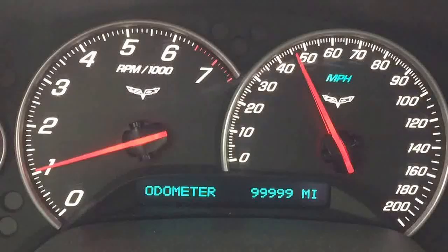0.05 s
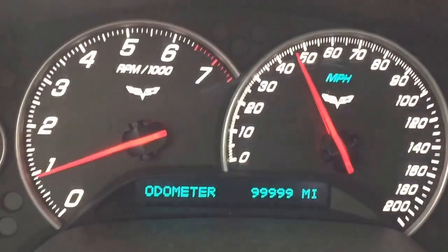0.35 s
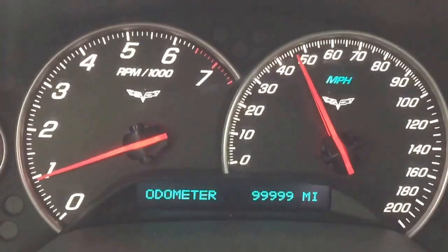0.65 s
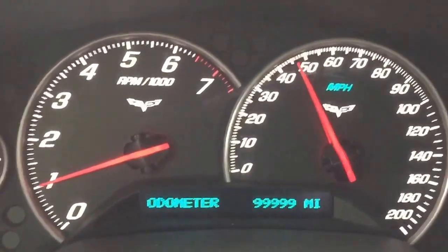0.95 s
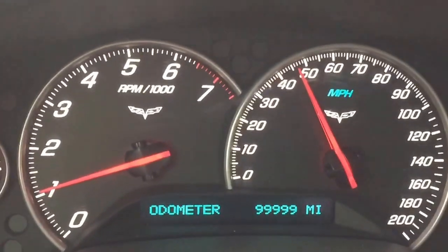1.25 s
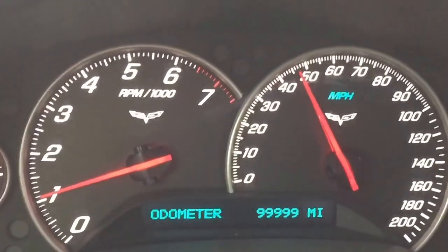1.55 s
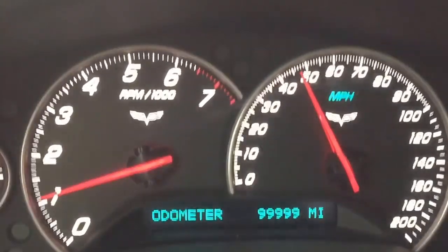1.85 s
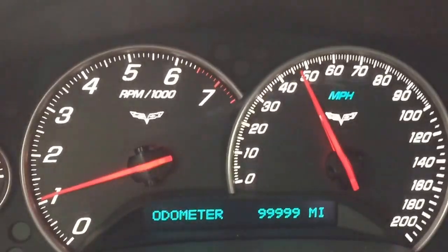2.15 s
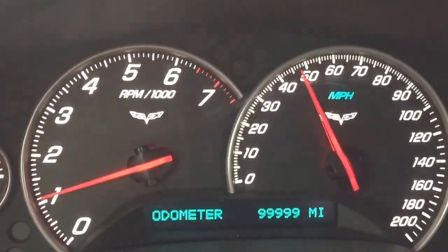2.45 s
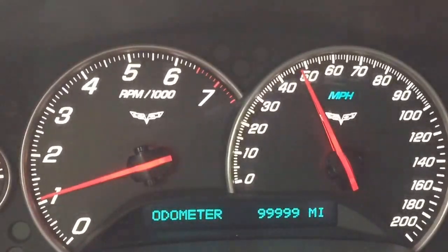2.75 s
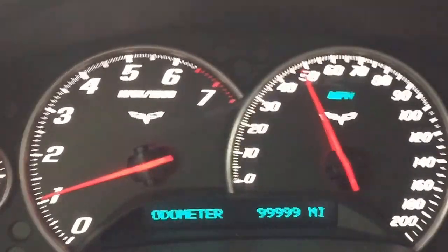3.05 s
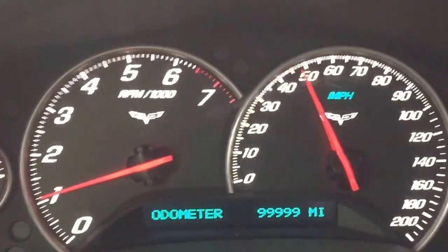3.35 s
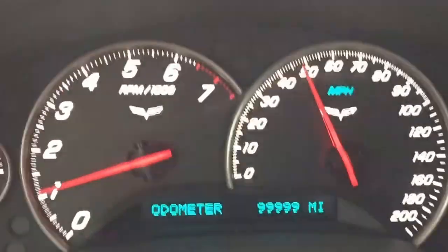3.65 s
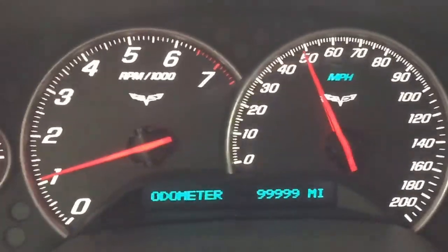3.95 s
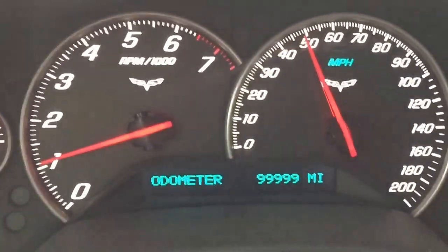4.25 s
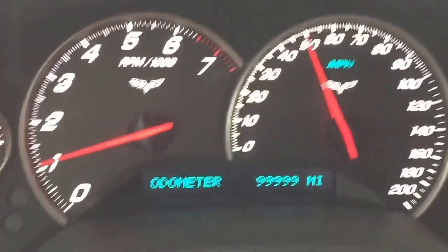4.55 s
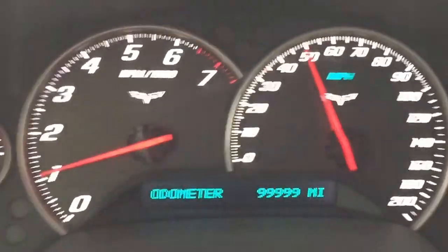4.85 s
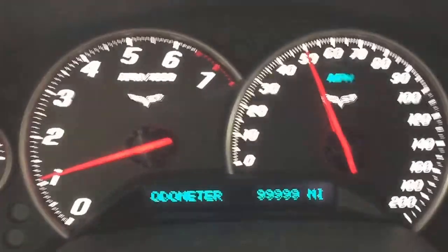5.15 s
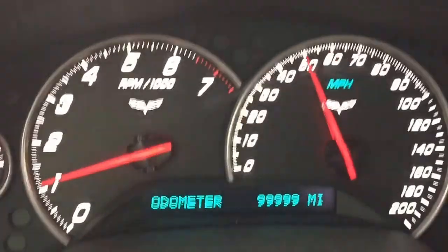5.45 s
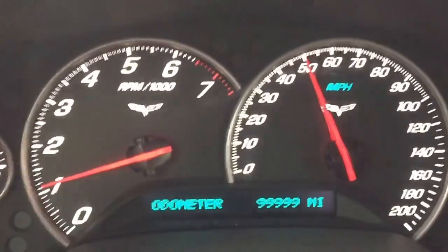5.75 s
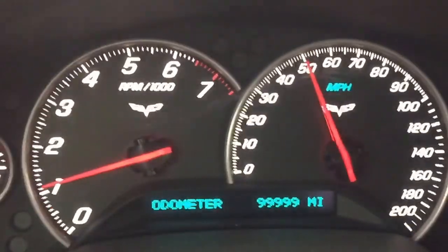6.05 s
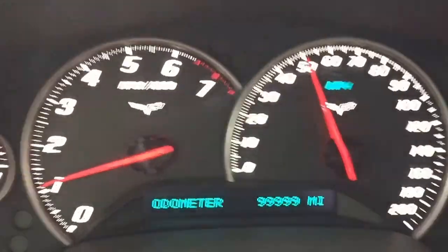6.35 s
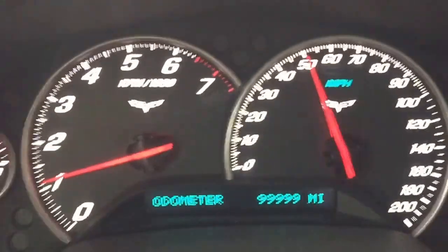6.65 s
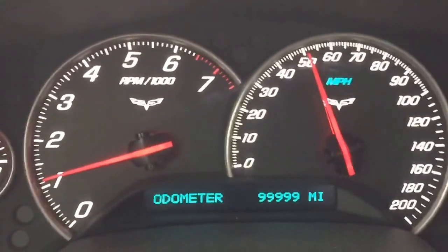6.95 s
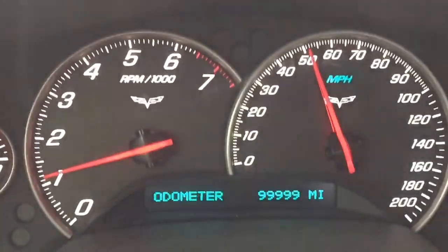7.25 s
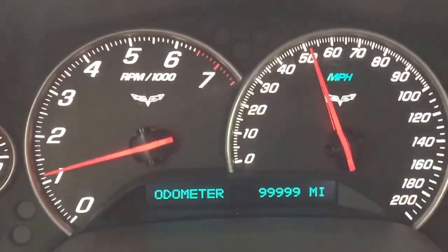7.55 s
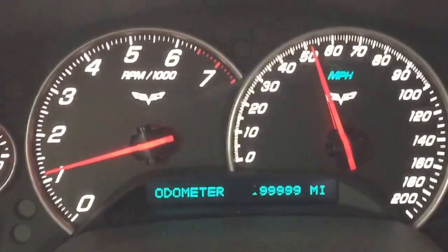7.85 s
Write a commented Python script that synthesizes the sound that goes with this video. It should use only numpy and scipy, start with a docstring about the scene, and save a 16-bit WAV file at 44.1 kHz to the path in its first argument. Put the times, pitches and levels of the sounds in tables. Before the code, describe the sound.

A deep, steady rumble fills the inside of a car on a highway for about eight seconds, heard from a handheld microphone. The body booms, the tyres roar and hum, and bumps add soft low thumps. A low droning tone at the start fades within the first second or so, as the engine's hum comes up. Throughout, a worn wheel bearing growls under the floor, pulsing about ten times a second, and everything creeps slightly up in pitch as the car gathers speed. Faint plastic ticks from a hand on the microphone come at around 1.1, 1.8 and 3.5 seconds. At about 4.8 to 5 seconds, two sharp, hollow clicks and a softer third stand out close up, followed by a very faint rub, thin squeak and trim chatter. Another knock comes at about 6.1 seconds, and the rumble carries on to the end.

```python
"""Road rumble inside a car gently gathering speed on a highway, taken in mono on a handheld recorder.
All around, the body booms and the tyres roar and hum; the slow-turning engine and the driveshaft drone.
From under the floor, a worn wheel bearing growls once in every turn of the wheel.
Right at the microphone a hand shifts on the case: plastic clicks, light rubs, two thin squeaks and
hollow knocks. Out in the cabin, loose trim chatters faintly."""
import sys
import numpy as np
from scipy import signal
from scipy.fft import rfft, irfft, next_fast_len
from scipy.io import wavfile
from scipy.ndimage import uniform_filter1d

SR = 44100
rng = np.random.default_rng(int(sys.argv[2]) if len(sys.argv) > 2 else 0)


def inscribe(sig):
    """Save sig as 16-bit PCM at rate SR to the path in sys.argv[1].

    A 1-D sig is mono; a 2-D sig holds one channel per row.
    Samples are clipped to [-1, 1] before scaling.
    """
    pcm = np.round(np.clip(np.atleast_2d(sig).T, -1, 1) * 32767)
    wavfile.write(sys.argv[1], SR, pcm.astype(np.int16))


N = 348390
TIME, HZ = np.arange(N) / SR, np.fft.rfftfreq(N, 1 / SR)
FIRINGS_PER_TURN, SHAFT_PER_TURN, BALLS_PER_TURN = 7.275, 5.195, 9.575  # cycles per turn of the wheel
BAND_EDGE_HZ = 16000

# Spectral shape of the road noise in the cabin: (frequency [Hz], relative density [dB])
ROAD_SPECTRUM = [(10, -58.5), (25, -33.5), (39, 3), (57, 5.5), (95, -3), (125, -13.5), (210, -16),
                 (300, -24.5), (470, -33), (900, -33), (1400, -36), (2500, -50), (4500, -70), (8000, -83),
                 (16000, -86)]
# Cabin and tyre-cavity resonances that the road excites: (centre [Hz], width [Hz], lift [dB])
CABIN_RESONANCES = [(145.4, 5.7, 5.5), (207, 2.2, 1), (251, 21, -1), (340, 10, -2), (408, 22, 4),
                    (462, 10, -4.5), (625.5, 5.4, 5.5), (757, 42, -2.5), (917, 27, 1.5), (1143, 3, 7.5),
                    (1467, 3.4, 9.5), (2152, 44, 5.5), (2703, 40, 5), (4900, 420, -5.5)]
# Rumble from the coarseness of the road surface: (time [s], level [dB])
SURFACE_RUMBLE = [(.1, -17.5), (.7, -36.5), (1.0, -26), (1.4, -28.5), (1.9, -22.5), (3.1, -24.5),
                  (4.5, -29.5), (5.6, -25), (7.0, -20.5), (7.9, -26.5)]
# Bumps in the road: (time [s], half length [s], suspension thump [dB], body boom [dB])
ROAD_BUMPS = [(0.298, 0.054, -19, -31), (0.514, 0.024, -20.5, -34), (0.702, 0.1, -19, -29.5),
              (1.11, 0.045, -25, -29), (1.79, 0.041, -17.5, -24), (2.202, 0.11, -31, -25.5),
              (2.509, 0.033, -17, -38), (2.753, 0.23, -29, -31), (3.485, 0.13, -39.5, -25),
              (3.683, 0.053, -16.5, -40), (4.301, 0.024, -20.5, -42), (4.831, 0.12, -19, -27.5),
              (5.004, 0.048, -17.5, -27), (5.14, 0.019, -15, -29), (5.65, 0.027, -17.5, -25.5),
              (5.92, 0.077, -16.5, -42), (6.174, 0.085, -35, -21.5), (6.87, 0.02, -20, -37),
              (7.368, 0.019, -15, -27.5), (7.633, 0.031, -14, -25.5)]
# Hums of the uneven tread: (order [cycles per tyre turn], level at resonance [dB])
TREAD_ORDERS = [(19, -36), (20, -38.5), (22, -33.5), (24, -37.5)]
# Engine tones under changing load: (time [s], firing tone [dB], its octave [dB])
ENGINE_LOAD = [(.1, -46, -36), (.7, -42.5, -36), (1.0, -25, -27), (1.5, -25, -32.5), (1.9, -26, -38.5),
               (2.5, -28, -30), (3.3, -23, -28.5), (4.25, -24.5, -34.5), (4.95, -34.5, -34),
               (6.1, -25, -32.5), (6.8, -26.5, -31), (7.8, -41, -41)]
# Half-order tone from uneven firing: (time [s], level [dB])
ENGINE_LOPE = [(.1, -36), (1.2, -35.5), (2.0, -51.5)]
# Hub and suspension modes that the bearing rings: (frequency [Hz], width [Hz], relative level [dB])
HUB_MODES = [(196.6, 38, -10.5), (286.2, 19, -6.5), (368.8, 46, 4), (408, 26, -4), (521.5, 34, -10.5),
             (556, 24, -2), (615.6, 15, -5.5), (675, 22, -12.5), (723, 24, -8.5), (753.3, 17, -12.5),
             (846, 38, -17.5), (934, 53, -11.5), (1128, 34, -17.5), (1454, 12, -19)]
# Growl of the worn bearing: (time [s], level [dB])
BEARING_GROWL = [(.09, -38), (.2, -42.5), (.3, -42), (.39, -37.5), (.49, -42), (.59, -39), (1.3, -38),
                 (1.4, -35), (1.5, -37), (1.61, -35.5), (1.95, -37.5), (2.1, -36.5), (3.45, -34.5),
                 (3.6, -36), (4.03, -34.5), (4.15, -34), (4.85, -35.5), (5.7, -35), (6.5, -37.5),
                 (7.8, -35.5)]
# Plastic clicks at the microphone: (time [s], level [dB], rise [s], low-end weight [dB], t60 [s],
# relative case ring [dB], relative ping [dB], ping pitch [Hz])
CASE_CLICKS = [(.268, -68, .0002, -24, .05, -12, -6, 6200), (.903, -64, .0002, -20, .05, -6, -17, 9500),
               (.982, -64, .0002, -20, .03, -6, -11, 9500), (1.111, -49.5, .0006, -16, .038, -2, -8, 5500),
               (1.3012, -57.5, .001, 3, 0.12, -7, -5, 6100), (1.795, -49, 0.0027, 0, .1, -5, -11, 6100),
               (3.485, -56.5, .002, -10, .19, -7, -13, 6200), (3.516, -52.5, .003, 9, 0.14, -4, -14, 4270),
               (3.6443, -61.5, .002, 17, 0.27, -4, -6, 4800), (4.803, -61, .0005, -13, 0.038, -7, -3, 5550),
               (4.821, -54, .0005, -3, .088, -6, -12, 5550), (4.8312, -24.5, .0006, -6, .068, 0, -20, 5600),
               (4.8398, -34.5, .0004, 8.5, 0.036, 2.5, -19, 5550),
               (4.883, -35.5, .0004, 6.5, 0.062, -5, -16, 5400), (4.950, -59, .0005, -5, .08, -6, -5, 6200),
               (5.0044, -44.5, 0.00051, 8, .045, -6, -9, 5550), (6.027, -62, 0.0017, 16, .19, -8, -6, 5550),
               (6.135, -35, .0005, 4, .051, -7, -24, 5550),
               (6.1378, -40.5, .0005, 7.5, 0.084, 0, -24, 6160)]
# Spectral shape of a click: (frequency [Hz], relative density [dB])
CLICK_SPECTRUM = [(200, -11.5), (500, 2.5), (900, 11.5), (2000, 9), (3500, 0.5), (5000, -3), (7500, -7),
                  (10000, -8.5), (13000, -10.5), (16000, -16)]
# Modes of the recorder's plastic case: (frequency [Hz], relative level [dB], t60 [s])
CASE_MODES = [(760, -11, .06), (1020, -9, .06), (1432, -7, .05), (1680, -4, .058), (1890, -8, .06),
              (2288, -8, .07), (2428, -7.5, .05), (3058, -9, .046), (3564, -17, .05), (4377, -20, .05),
              (5480, -25, .065), (8764, -22, .055), (9545, -21.5, .06), (13370, -28, .05)]
# Clear modes of a small plastic part: (multiple of the ping pitch [ratio], relative level [dB], t60 [s])
PING_MODES = [(.85, -14, 0.04), (1, 6, 0.05), (1.17, -4.5, 0.045), (1.8, -18.5, .04), (2.56, -6, 0.045)]
# Rubs of the hand, and the brief narrow ringing of small plastic ticks:
# (time [s], half length [s], level [dB], centre [Hz], width [Hz])
RUBS_AND_TICKS = [(.285, 0.0087, -74, 6270, 392), (.735, 0.021, -74, 4600, 1200),
                  (3.524, .01, -63.5, 4290, 300), (3.645, 0.0091, -63, 4830, 500),
                  (3.677, .016, -73, 5460, 90), (3.745, .025, -73.5, 11500, 1900),
                  (4.94, 0.079, -66, 4500, 4000), (5.047, 0.074, -66, 4500, 4000),
                  (5.082, .008, -69, 5800, 1200), (5.2, 0.11, -74, 11900, 2400),
                  (1.22, .09, -81, 11000, 2600), (5.197, .07, -70, 4450, 80), (5.22, 0.15, -71, 3600, 1700),
                  (5.58, 0.032, -75, 11800, 1690), (5.68, 0.2, -72, 4600, 2860),
                  (6.19, 0.027, -65, 4540, 3600), (6.313, 0.034, -72, 5000, 3040),
                  (7.36, 0.066, -76, 5000, 2980), (7.81, .06, -76, 4500, 900)]
# Squeaks of a sliding fingertip: (time [s], half length [s], level [dB], top pitch [Hz])
FINGER_SQUEAKS = [(1.23, 0.13, -78, 10650), (5.176, .08, -66.5, 12000)]
# Partials of a squeak: (multiple of its pitch [ratio], relative level [dB])
SQUEAK_PARTIALS = [(.78, -11), (.86, -10), (.915, -4), (1, 1.5), (1.09, -10.5), (1.175, -4.5), (1.245, -4)]
# Spells of chatter from shaken trim: (time [s], half length [s], level [dB])
TRIM_RATTLES = [(1.88, 0.13, -77), (3.757, 0.17, -73.5), (4.94, .04, -65), (5.05, 0.053, -66),
                (5.69, 0.16, -74), (6.18, .014, -64)]
# Modes of the loose trim: (frequency [Hz], relative level [dB], t60 [s])
TRIM_MODES = [(3730, 2, .014), (4450, 2, .02), (4800, -1, .012), (5550, -2, .02), (6200, -1, .02),
              (6900, -5, .012), (8270, -9, .014), (9000, -10, .025), (9545, -10, .018), (12230, -12, .008)]
# Hard clicks that jar the whole case: (time [s], clunk [dB], clunk pitch [Hz], clunk t60 [s], thud [dB])
CASE_KNOCKS = [(4.832, -13.8, 883, .06, -21), (4.884, -16.5, 890, .05, -18), (5.005, -28, 900, .06, -24),
               (6.138, -26.5, 921, .06, -24)]


def amp(db):
    """Decibels to gain."""
    return 10 ** (np.asarray(db) / 20)


def unit(x):
    """Scales to rms 1."""
    return x / np.sqrt(np.mean(x ** 2) + 1e-20)


def curve(rows, column=1):
    """One column of a timed table, interpolated at every sample."""
    rows = np.asarray(rows)
    return np.interp(TIME, rows[:, 0], rows[:, column])


def swell(time_s, half_s):
    """A bell-shaped envelope, down to 1/e at half_s either side of its peak."""
    return np.exp(-((TIME - time_s) / half_s) ** 2)


def colour(points, resonances, hz):
    """Gain of a broad spectrum with resonant humps on it."""
    points_hz, db = np.transpose(points)
    humps = sum(lift * np.exp(-.5 * ((hz - centre) / width) ** 2) for centre, width, lift in resonances)
    return amp(np.interp(np.log(hz + 1), np.log(points_hz), db) + humps)


def noise(gain, size=N):
    """Noise of rms 1 with the given spectrum."""
    padded = next_fast_len(size, True)
    white = rfft(rng.standard_normal(padded))
    shape = np.interp(np.linspace(0, 1, len(white)), np.linspace(0, 1, len(gain)), gain)
    return unit(irfft(white * shape, padded)[:size])


def drift(rate_hz):
    """A slow random wander of rms 1."""
    return noise(np.exp(-.5 * (HZ / rate_hz) ** 2))


def below(edge_hz):
    """Low side of a steep crossover, as a share of power."""
    return 1 / (1 + (HZ / edge_hz) ** 12)


def steadied(x, span_s):
    """Takes the slow swells out of a noise."""
    size = int(span_s * SR)
    return x / np.sqrt(uniform_filter1d(uniform_filter1d(x ** 2, size), size) + 1e-12)


def resonance(hz, centre_hz, width_hz):
    """Gain of a resonance for a tone that glides through it."""
    return 1 / np.hypot(1, 2 * (hz - centre_hz) / width_hz)


def hum(cycles, rate_hz=3, wander=.063):
    """A tone of rms 1 with a slightly unsteady phase."""
    return np.sqrt(2) * np.cos(2 * np.pi * (cycles + wander * drift(rate_hz)))


def ring(t, hz, db, t60):
    """One struck mode dying away."""
    return amp(db - 60 * t / t60) * np.sin(2 * np.pi * hz * t)


def add(mix, time_s, sound):
    """Mixes a sound in at the given time."""
    part = mix[round(time_s * SR):][:len(sound)]
    part += sound[:len(part)]


def road(boom_db=-26.5, roar_db=-37.5, roar_rise_db_per_s=.1023):
    """All around the microphone: the road shakes the suspension, booms in the body, roars off the tyres."""
    cabin = colour(ROAD_SPECTRUM, CABIN_RESONANCES, HZ)
    lows, low_mids = below(90.6), below(297.5)
    bump_thumps = sum(amp(db) * swell(time_s, half_s) for time_s, half_s, db, _ in ROAD_BUMPS)
    bump_booms = sum(amp(db) * swell(time_s, half_s) for time_s, half_s, _, db in ROAD_BUMPS)
    rumble = steadied(noise(cabin * np.sqrt(lows)), span_s=.014)
    rumble *= np.hypot(amp(curve(SURFACE_RUMBLE) - .5 * drift(9.5)), bump_thumps)
    boom = steadied(noise(cabin * np.sqrt((1 - lows) * low_mids)), span_s=.15)
    boom *= np.hypot(amp(boom_db + drift(12)), bump_booms)
    roar = noise(cabin * np.sqrt(1 - low_mids))
    roar *= amp(roar_db + roar_rise_db_per_s * TIME + .5 * drift(33))
    return rumble + boom + roar


def body_drone(peak_db=-23.5, drone_hz=59.4):
    """Early on, the body drones on a near-pure low tone that soon fades."""
    return amp(peak_db) * swell(time_s=.16, half_s=.88) * hum(drone_hz * TIME, rate_hz=3.1, wander=.18)


def tyre_tread(turns, wheel_hz, tyre_ratio=.998):
    """An out-of-round tyre, a shade slower than the worn wheel, hums; the air inside it resonates."""
    out = np.zeros(N)
    for order, db in TREAD_ORDERS:
        per_turn = order * tyre_ratio
        cavity = resonance(per_turn * wheel_hz, centre_hz=199.7, width_hz=14)
        out += amp(db + 2 * drift(3.4)) * cavity * hum(per_turn * turns)
    return out


def engine(turns, throb_hz=2.28, throb_peak_s=.99, throb_depth=.48, third_db=-43):
    """Up ahead, the engine fires in step with the wheels; its two lowest tones follow the load."""
    firings = FIRINGS_PER_TURN * turns
    throb = 1 + throb_depth * np.cos(2 * np.pi * throb_hz * (TIME - throb_peak_s))
    fundamental = amp(curve(ENGINE_LOAD)) * hum(firings)
    octave = amp(curve(ENGINE_LOAD, column=2)) * throb * hum(2 * firings)
    lope = amp(curve(ENGINE_LOPE)) * hum(2.5 * firings)
    return fundamental + octave + lope + amp(third_db) * hum(3 * firings)


def driveshaft(turns, wheel_hz, peak_db=-30, joints_db=-42.5):
    """The shaft's tone climbs through a resonance of the body; its joints hum at four times its rate."""
    shaft_turns = SHAFT_PER_TURN * turns
    body = resonance(SHAFT_PER_TURN * wheel_hz, centre_hz=53.7, width_hz=4.9)
    return amp(peak_db) * body * hum(shaft_turns) + amp(joints_db) * hum(4 * shaft_turns)


def wheel_bearing(turns, load_phase=.13, tightness=2.9, slack=.013, grit=.11, drag=.034):
    """Under the floor, balls knock over a pit in the race, which takes the car's weight once a turn."""
    angle = 2 * np.pi * (turns + load_phase)
    load = slack + np.exp(tightness * (np.cos(angle) - 1))
    # the balls slow a little as they squeeze through the loaded side
    passes = BALLS_PER_TURN * turns - drag * np.sin(angle) + .012 * drift(7.3)
    impacts = unit(sum(np.cos(2 * np.pi * k * passes) for k in range(1, 18)))
    force = load * (impacts + grit * noise(below(1700))) * amp(1.3 * drift(8.6))
    # squaring each mode keeps the valleys between them dark
    hub = sum(amp(db) / (1 + 2j * (HZ - hz) / width) ** 2 for hz, width, db in HUB_MODES)
    return amp(curve(BEARING_GROWL)) * unit(irfft(rfft(force) * hub, N))


def case_clicks(tail_db=-28, tail_t60=.21, crack_s=.001, crackle_db=3.5):
    """At the microphone, plastic cracks, crackles, rings and pings, with a faint cabin tail."""
    out, size = np.zeros(N), SR // 4
    t, hz = np.arange(size) / SR, np.fft.rfftfreq(size, 1 / SR)
    snap = colour(CLICK_SPECTRUM, [], hz)
    for time_s, db, rise_s, weight_db, t60, case_db, ping_db, ping_hz in CASE_CLICKS:
        weight = amp(weight_db / (1 + (hz / 3800) ** 4))
        crackle = noise(snap * weight, size) * np.linalg.norm(snap * weight) / np.linalg.norm(snap)
        decay = amp(-60 * t / t60) + amp(tail_db - 60 * t / tail_t60)
        crack = 1.3 * np.exp(-t / crack_s) * noise(snap * hz / (hz + 6000), size)
        case = sum(np.interp(f, hz, weight) * ring(t, f, level, fade) for f, level, fade in CASE_MODES)
        ping = sum(ring(t, ratio * ping_hz, level, fade)
                   for ratio, level, fade in PING_MODES if ratio * ping_hz < BAND_EDGE_HZ)
        click = amp(crackle_db) * crackle * decay + crack + amp(case_db) * case + amp(ping_db) * ping
        add(out, time_s, amp(db) * click * (1 - np.exp(-t / rise_s)))
    return out


def rubs_and_ticks(grain_db=.3, slip_hz=120):
    """Close up, skin sticks and slips on the case in grainy swishes; small plastic ticks ring briefly."""
    out = np.zeros(N)
    grain = unit(amp(grain_db * drift(slip_hz)))
    for time_s, half_s, db, centre_hz, width_hz in RUBS_AND_TICKS:
        band = np.exp(-.5 * ((HZ - centre_hz) / width_hz) ** 2)
        out += amp(db) * swell(time_s, half_s) * noise(band)
    return out * grain


def finger_squeaks(sag=.075, blur_hz=60, grain_db=4, slip_hz=22, wobble=.007):
    """A fingertip on the case squeals in thin, broken chirps; pitch rises and falls with its speed."""
    out = np.zeros(N)
    for time_s, half_s, db, top_hz in FINGER_SQUEAKS:
        pitch_hz = top_hz * np.exp(-sag * ((TIME - time_s) / half_s) ** 2)
        squeal = np.zeros(N)
        for ratio, level in SQUEAK_PARTIALS:
            flicker = amp(level + grain_db * drift(slip_hz)) * drift(blur_hz)
            partial_hz = ratio * pitch_hz * (1 + wobble * drift(slip_hz))
            squeal += flicker * np.cos(2 * np.pi * np.cumsum(partial_hz) / SR)
        out += amp(db) * swell(time_s, half_s) * unit(squeal)
    return out


def trim_rattles(taps_per_s=170, spread_db=4):
    """Out in the cabin, loose trim taps at random; each tap rings its modes in a different blend."""
    chatter, t = np.zeros(N), np.arange(SR // 8) / SR
    taps = rng.random(N) < taps_per_s / SR
    for hz, db, t60 in TRIM_MODES:
        strikes = taps * amp(spread_db * rng.standard_normal(N))
        chatter += signal.oaconvolve(strikes, ring(t, hz, db, t60))[:N]
    return unit(chatter) * sum(amp(db) * swell(time_s, half_s) for time_s, half_s, db in TRIM_RATTLES)


def case_knocks(rise_s=.0045, thud_hz=94, thud_t60=.13):
    """Jarred in the hand, the case gives a hollow clunk that takes a moment to build, over a dull thud."""
    out, t = np.zeros(N), np.arange(SR // 4) / SR
    for time_s, clunk_db, clunk_hz, clunk_t60, thud_db in CASE_KNOCKS:
        clunk = ring(t, clunk_hz, clunk_db, clunk_t60)
        thud = ring(t, thud_hz, thud_db, thud_t60)
        add(out, time_s, (clunk + thud) * (1 - np.exp(-t / rise_s)))
    return out


def scene(start_hz=9.68, rise_hz_per_s=.1857, ease_s=74, start_turn=.264):
    """The cabin at one microphone; all that turns follows the wheels, whose gain in speed slowly eases."""
    wheel_hz = start_hz + rise_hz_per_s * TIME * (1 - TIME / ease_s)
    turns = start_turn + np.cumsum(wheel_hz) / SR
    rolling = road() + body_drone() + tyre_tread(turns, wheel_hz)
    machinery = engine(turns) + driveshaft(turns, wheel_hz) + wheel_bearing(turns)
    nearby = case_clicks() + rubs_and_ticks() + finger_squeaks() + trim_rattles() + case_knocks()
    return (rolling + machinery + nearby)[None]


def record(dry, open_s=.058):
    """The handheld recorder opens after an instant, limits the band and closes at the end."""
    fade_in = np.clip((TIME - open_s) / .0005, 0, 1)
    fade_out = np.clip((TIME[-1] - TIME) / .002, 0, 1)
    lowpass = signal.firwin(511, BAND_EDGE_HZ, window=("kaiser", 9), fs=SR)
    return signal.oaconvolve(dry * fade_in * fade_out, lowpass[None], "same")


dry = scene()
out = record(dry)
inscribe(out)
```